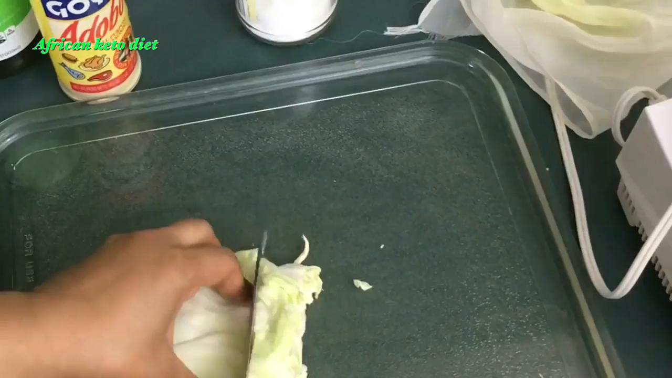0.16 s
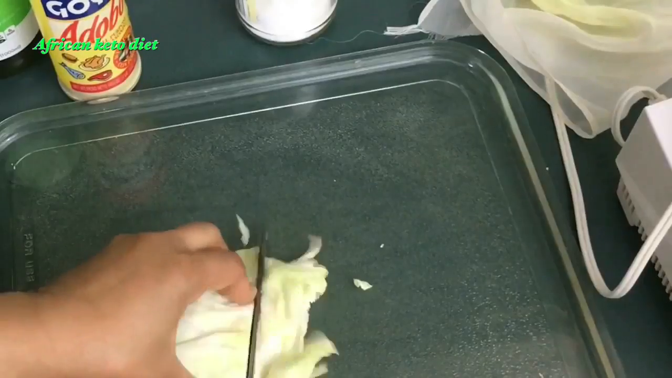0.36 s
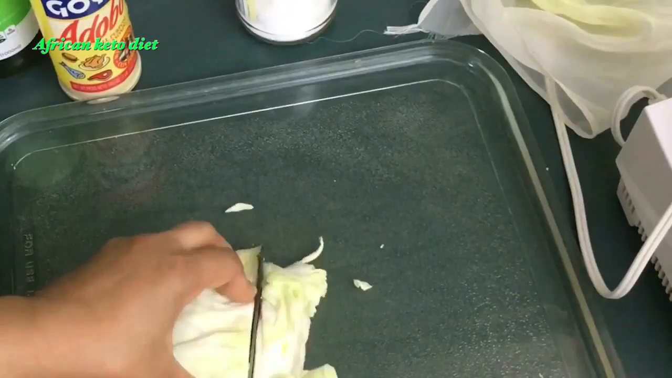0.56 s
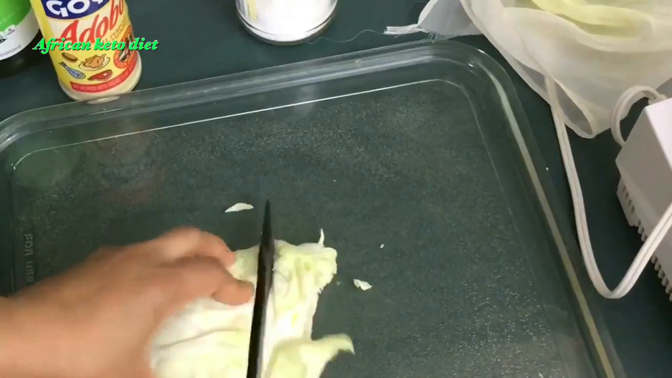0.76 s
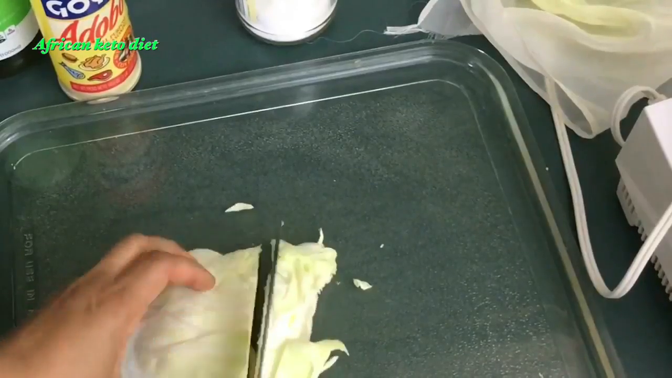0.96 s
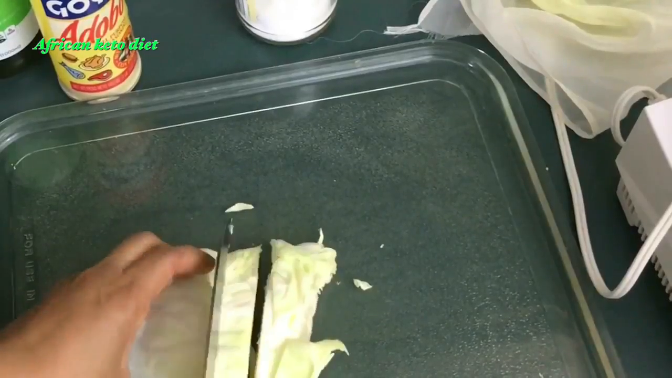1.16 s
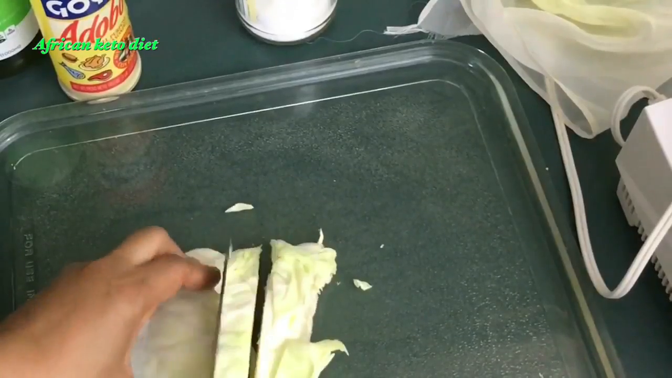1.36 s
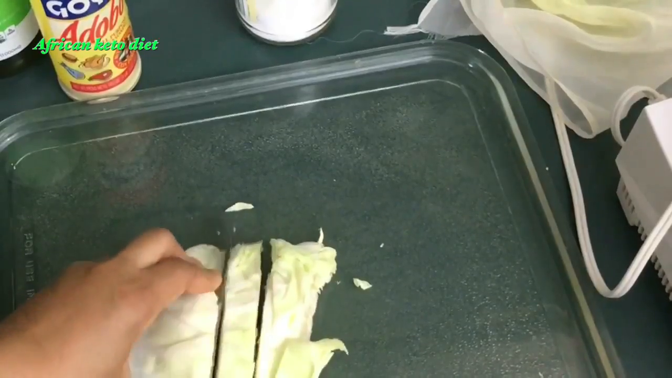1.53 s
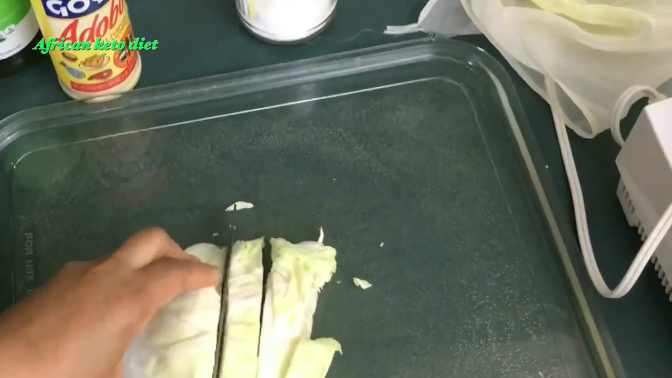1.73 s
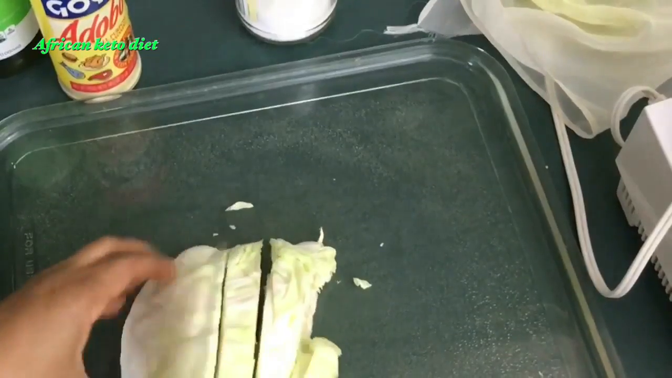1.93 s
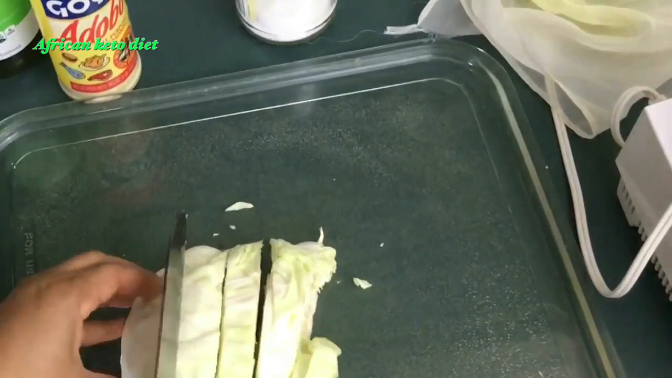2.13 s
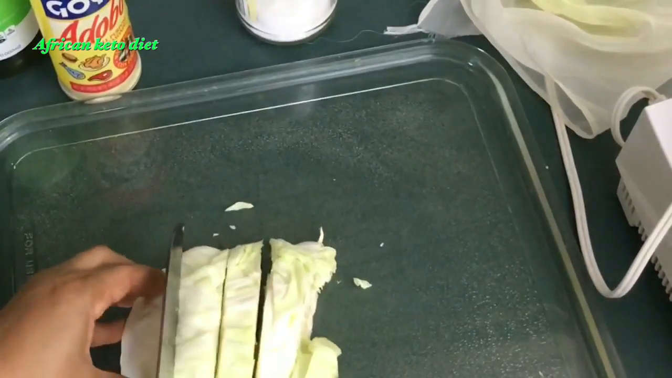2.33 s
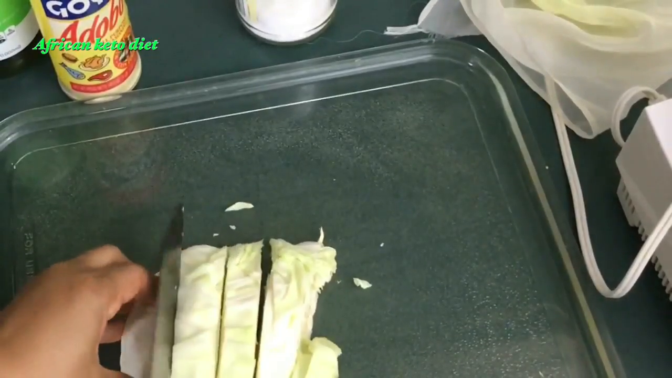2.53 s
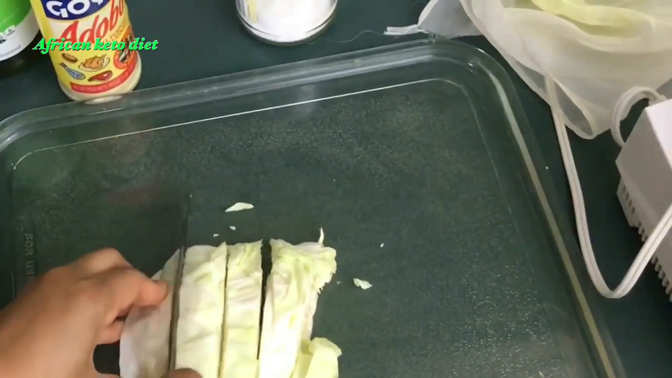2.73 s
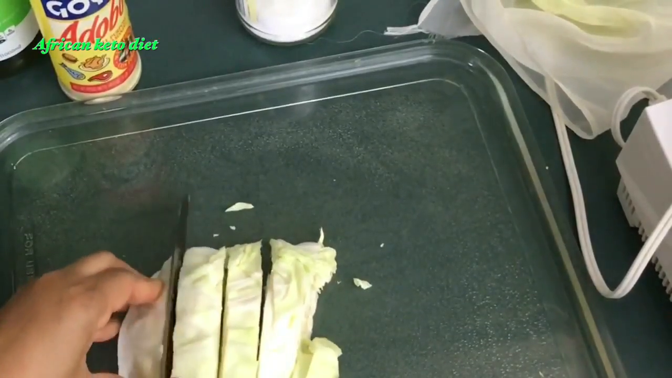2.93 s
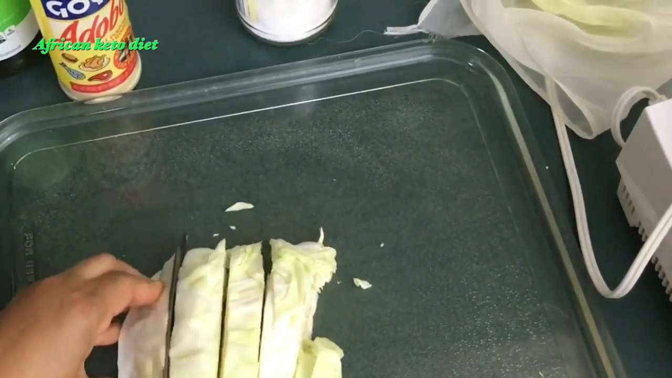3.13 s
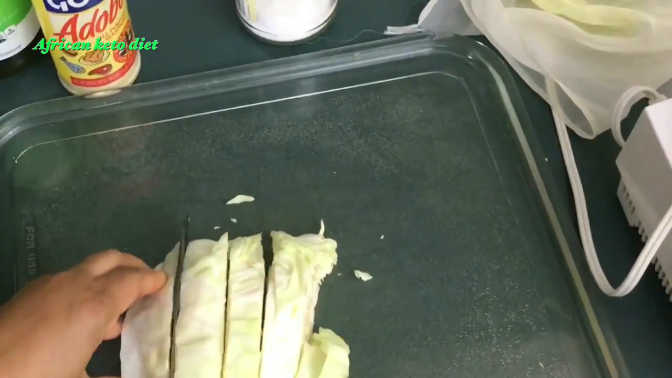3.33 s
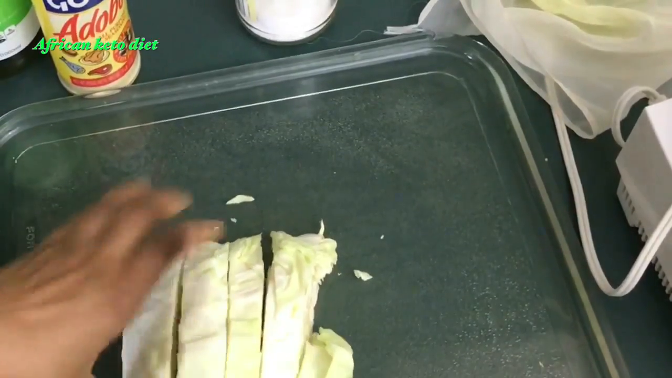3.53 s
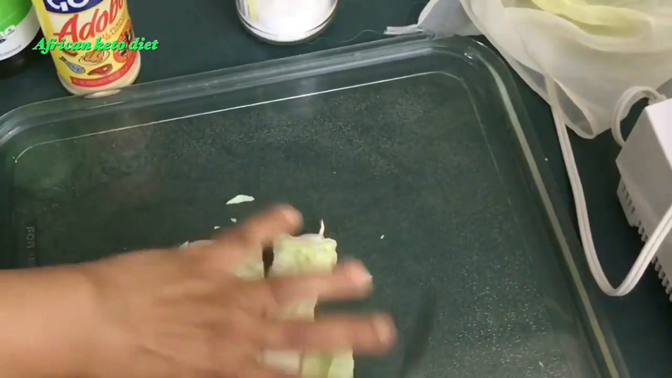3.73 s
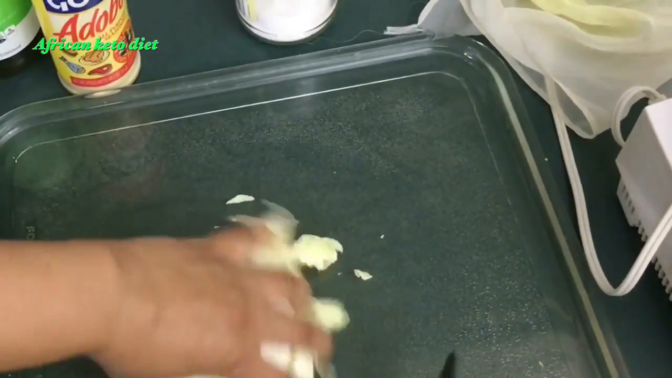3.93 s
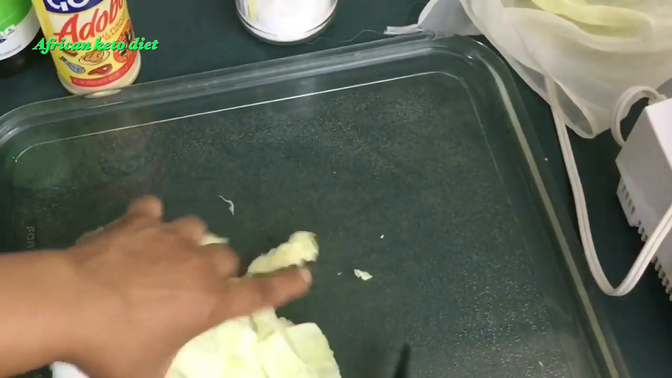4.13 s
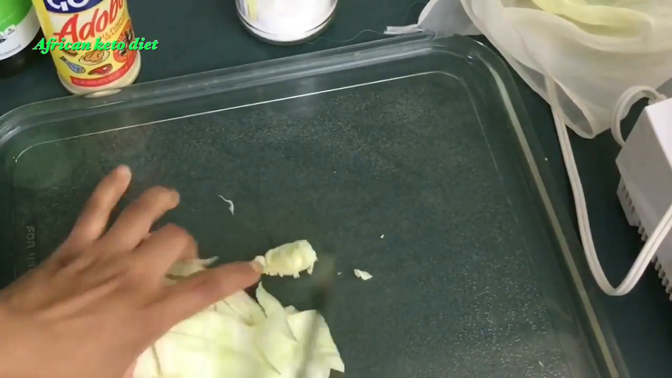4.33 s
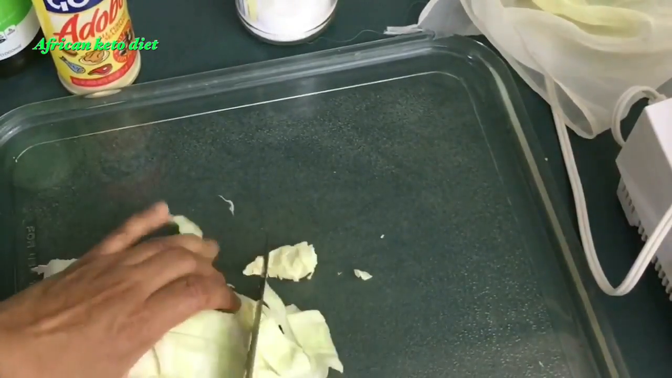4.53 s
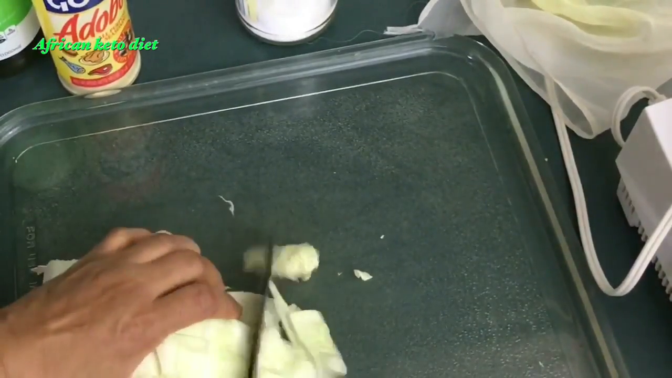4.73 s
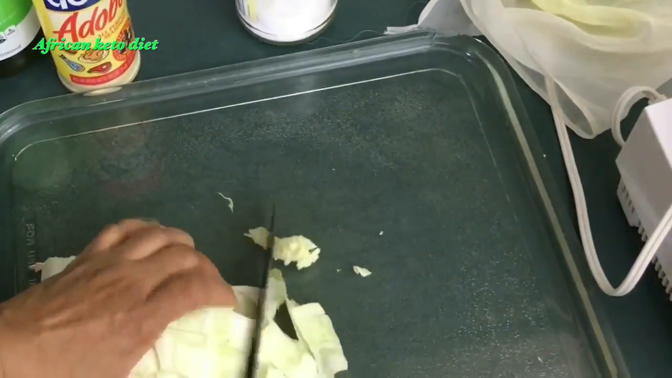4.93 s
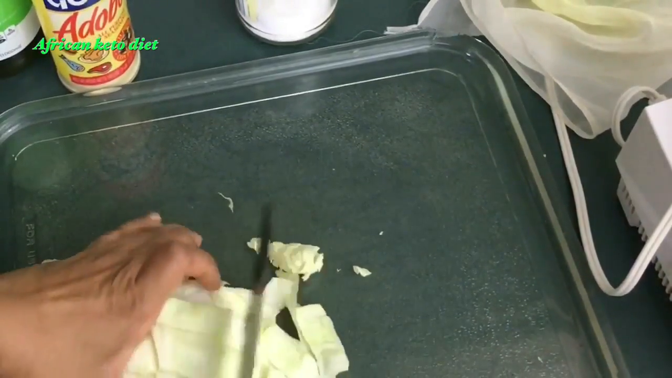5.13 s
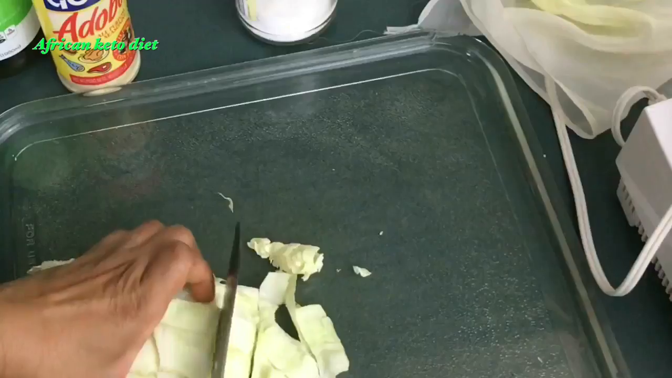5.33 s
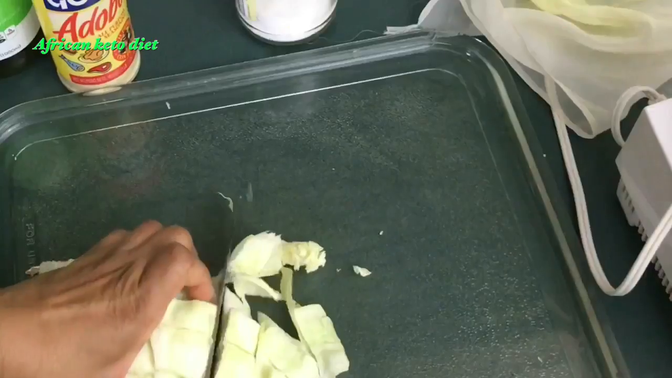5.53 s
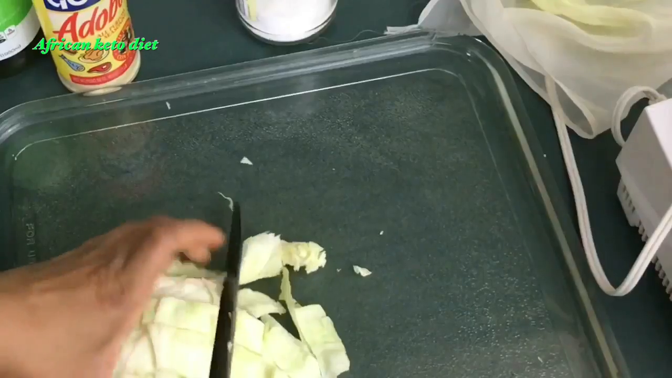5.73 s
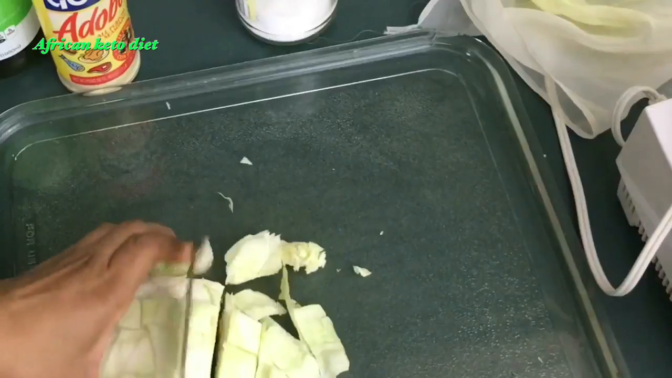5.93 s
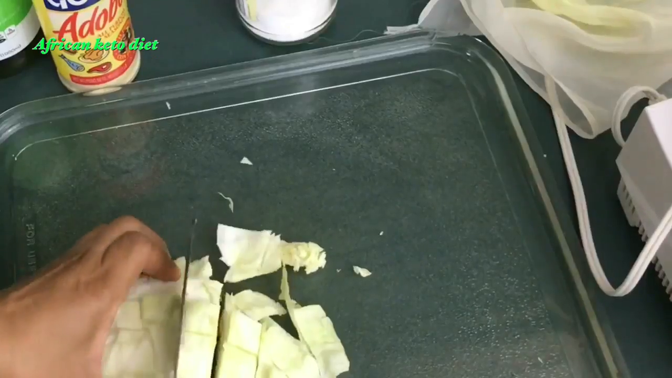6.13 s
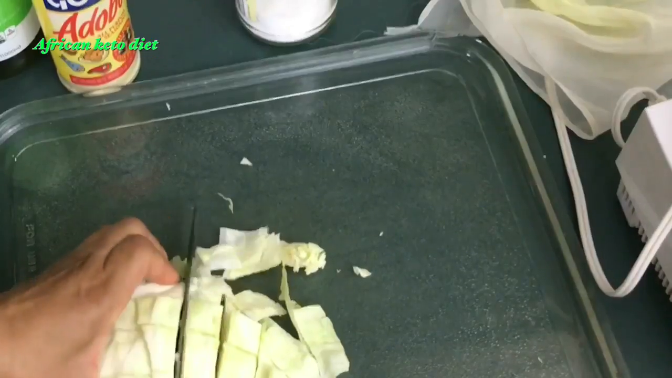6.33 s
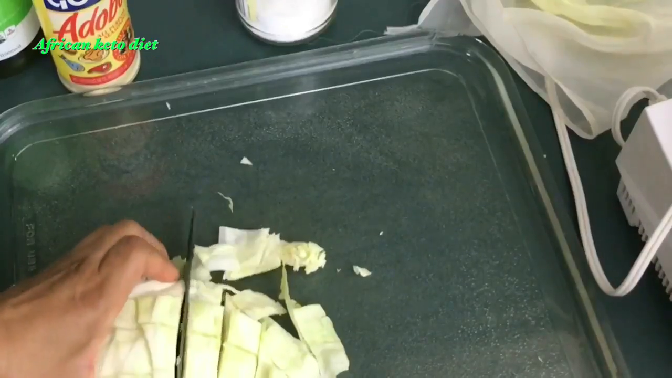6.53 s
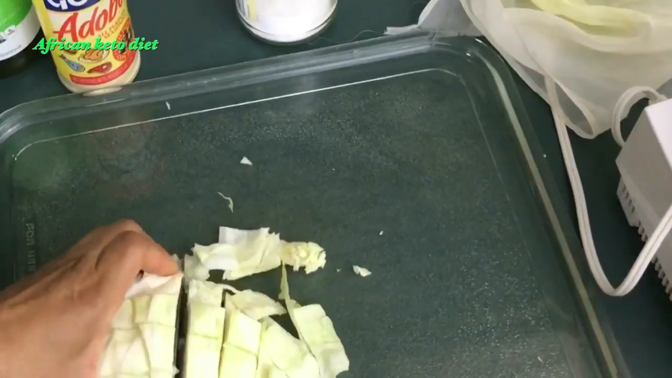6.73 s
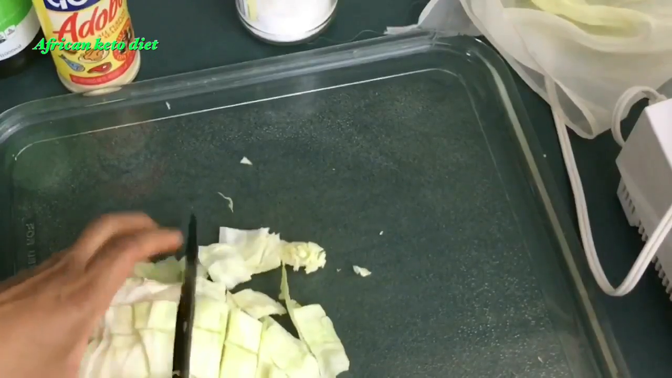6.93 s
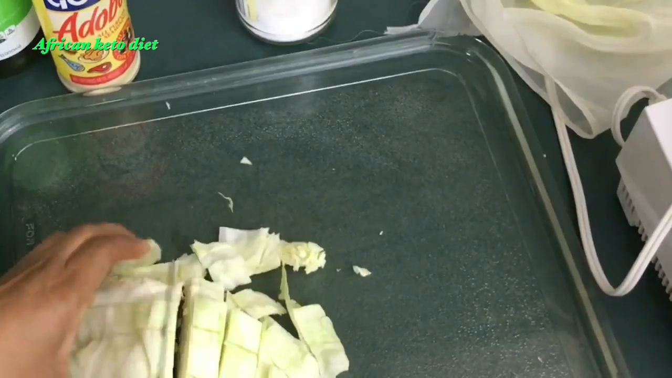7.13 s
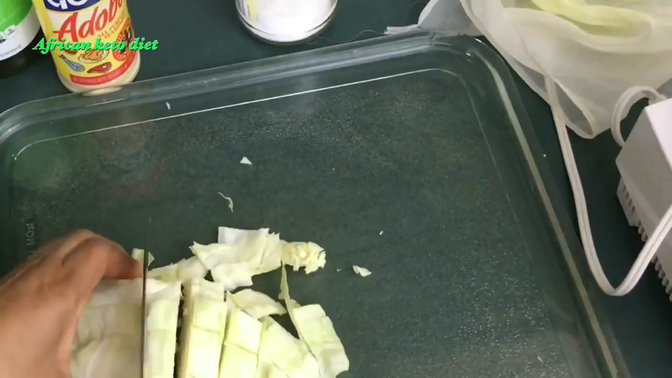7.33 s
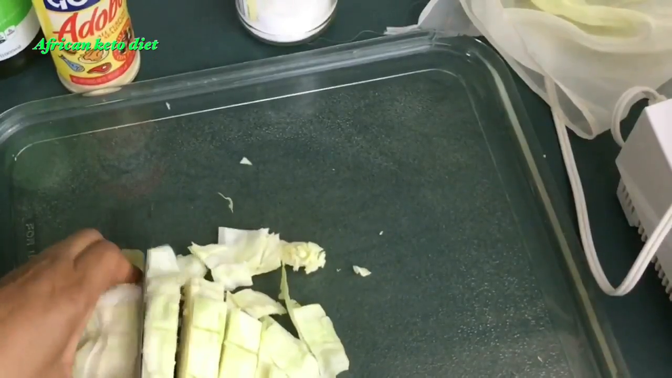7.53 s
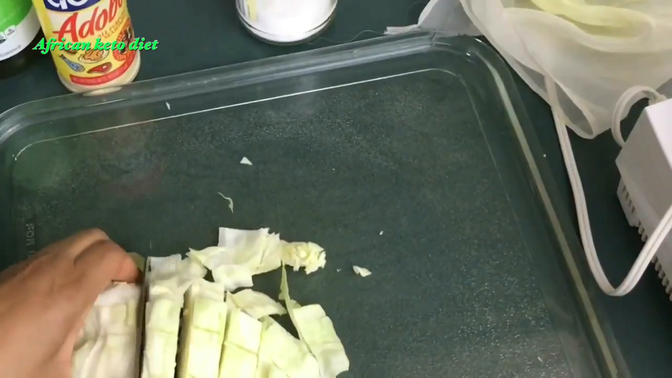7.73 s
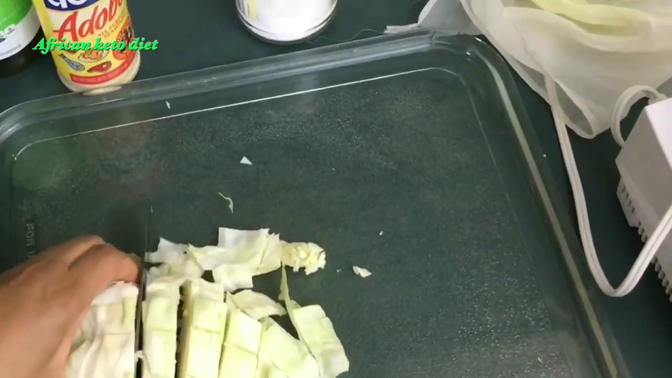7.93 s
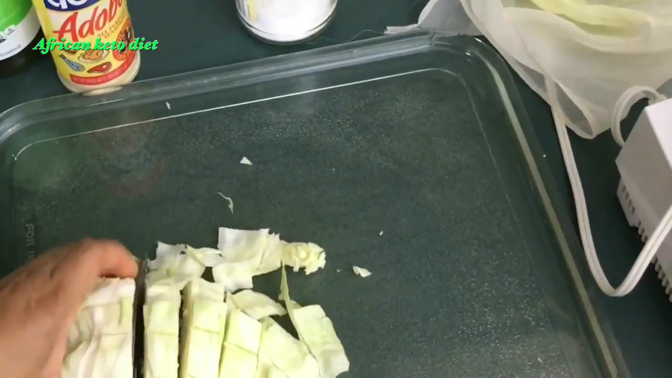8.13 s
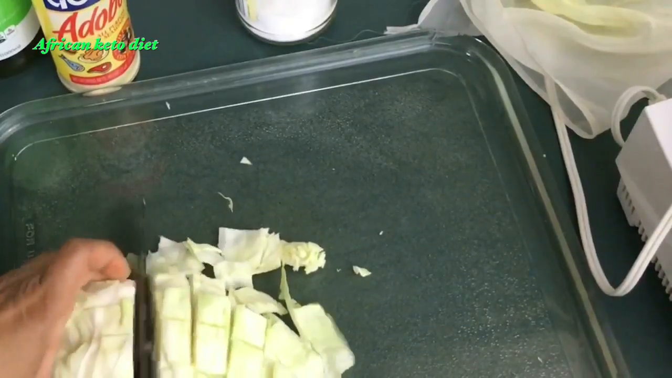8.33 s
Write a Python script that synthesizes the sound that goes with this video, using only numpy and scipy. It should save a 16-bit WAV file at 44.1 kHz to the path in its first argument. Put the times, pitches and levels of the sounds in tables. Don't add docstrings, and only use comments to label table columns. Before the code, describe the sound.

Close phone pickup in a small, hard-walled kitchen: a knife crunches through cabbage, leaves crackling and thick ribs snapping, until the blade bangs on a glass dish. The loudest landings distort, with brief glassy and steely ringing and a low counter thud. Leaves rustle and slide between cuts over a soft appliance hum.

```python
import sys
import numpy as np
from scipy import signal
from scipy.io import wavfile
from scipy.ndimage import uniform_filter1d

SR = 44100
rng = np.random.default_rng(int(sys.argv[2]) if len(sys.argv) > 2 else 0)


def transcribe(u):
    v = np.clip(np.atleast_2d(u).T, -1, 1)
    q = np.round(v * 32767).astype(np.int16)
    wavfile.write(sys.argv[1], SR, q)


def ratio_of_db(decibels):
    return 10 ** (np.asarray(decibels, float) / 20)


N = 373527


def rms_one(x):
    return x / np.sqrt(np.mean(x ** 2) + 1e-20)


def at_hz(points, hz, column=1):
    points = np.array(points)
    return np.interp(np.log(hz), np.log(points[:, 0]), points[:, column])


def band(x, low_hz, high_hz):
    edges_hz = [low_hz, min(high_hz, 0.45 * SR)]
    return signal.sosfilt(signal.butter(2, edges_hz, "band", fs=SR, output="sos"), x)


def drift(rate_hz):
    r = np.exp(-2 * np.pi * rate_hz / SR)
    slow = signal.lfilter([1], [1, -2 * r, r * r], rng.standard_normal(N + SR))
    return rms_one(slow[SR:])


def ring(force, hz, t60_s):
    r, w = ratio_of_db(-60 / (t60_s * SR)), 2 * np.pi * hz / SR
    return signal.lfilter([0, np.sin(w)], [1, -2 * r * np.cos(w), r * r], force + 1e-18)


def add(out, s, sound):
    start = round(s * SR)
    out[start:start + len(sound)] += sound[:N - start]


def octave_thirds(count):
    edges, white = 22 * 2 ** (np.arange(30) / 3), rng.standard_normal((2, count))
    bands = enumerate(zip(edges, edges[1:]))
    return [(np.sqrt(low * high), band(white[k % 2], low, high)) for k, (low, high) in bands]


# pitch_hz, level_db (per Hz)
HUM_SPECTRUM = [(15, -45), (25, 7), (64, 5), (161, -5.5), (229, 4), (463, -15), (796, -11.5), (936, -4.5),
                (1040, -13.5), (1840, -15.5), (2760, -22), (6560, -24.5), (10400, -29), (14800, -31.5),
                (16500, -43.5)]


def hum():
    noise = sum(ratio_of_db(at_hz(HUM_SPECTRUM, hz)) * part for hz, part in octave_thirds(count=N))
    return ratio_of_db(-44 + 1.0 * drift(0.69)) * rms_one(noise)


# pitch_hz, level_db, t60_s
KITCHEN_ECHO = [(151, 2, 0.3), (400, 1.5, 0.32), (1000, 7, 0.31), (2556, 3.5, 0.38), (4250, 1, 0.39),
                (7000, -6.5, 0.31), (10500, -3, 0.17), (14900, 1.5, 0.16)]


def walls():
    t, room = np.arange(SR) / SR, []
    for hz, part in octave_thirds(count=SR):
        fall_db = 60 * t / at_hz(KITCHEN_ECHO, hz, column=2)
        fading = ratio_of_db(-fall_db) + ratio_of_db(-21.5 - 0.39 * fall_db)
        room.append((ratio_of_db(at_hz(KITCHEN_ECHO, hz)) * fading, part))
    return room


def kitchen(x, room, spot):
    t = np.arange(SR) / SR
    echo = sum(fading * np.roll(part, spot * SR // 11) for fading, part in room)
    echo *= 1 - np.exp(-t / 0.00038)
    return signal.fftconvolve(x, echo / np.sqrt(np.sum(echo ** 2)))[:N]


# pitch_hz, level_db, t60_s
COUNTER_MODES = [
    (79.6, -5.5, 0.11),
    (141.9, -3, 0.12),
    (233, -8.5, 0.11),
]


def counter(force):
    return sum(ratio_of_db(level_db) * ring(force, hz, t60_s) for hz, level_db, t60_s in COUNTER_MODES)


# peak_s, level_db
LEANS = [(0.0, -33), (.16, -29.5), (.45, -29), (1.27, -40.5), (1.55, -28.5), (1.72, -20), (2.6, -32.5),
         (2.78, -25.5), (3.0, -42), (3.2, -41), (3.35, -27), (4.17, -33.5), (4.88, -25.5), (5.37, -39.5),
         (5.59, -22.5), (6.1, -43), (6.27, -29), (6.46, -23.5), (7.45, -37.5), (7.709, -27), (8.09, -24.5),
         (8.4, -44)]


def weight():
    rise_db_per_s, fade_db_per_s, rest_db = 165, 164, -51
    t, level_db = np.arange(N) / SR, rest_db
    for s, peak_db in LEANS:
        away_db = np.maximum(rise_db_per_s * (s - t), fade_db_per_s * (t - s))
        level_db = np.maximum(level_db, peak_db - away_db)
    return ratio_of_db(level_db)


def narrow_swells(table):
    out, white = np.zeros(N), rng.standard_normal(N + SR)
    for s, length_s, hz, width_hz, level_db in table:
        grain = white[round(hz):][:round(length_s * SR)]
        rub = band(grain, hz - width_hz / 2, hz + width_hz / 2)
        add(out, s, ratio_of_db(level_db) * rms_one(rub) * signal.windows.tukey(len(rub), 0.85))
    return out


# start_s, length_s, pitch_hz, width_hz, level_db
BUMPS = [(1.242, 0.17, 45.3, 31, -36), (1.501, 0.16, 77, 25, -27), (1.64, 0.098, 140, 46, -20.5),
         (2.2, 1.65, 91.5, 7.9, -41.5), (2.237, 0.15, 44.7, 32, -39.5), (2.877, 0.12, 42, 36, -35),
         (4.896, 0.18, 45, 57, -35), (5.348, 0.097, 54.6, 43, -36), (6.087, 0.13, 48, 26, -39),
         (6.265, 0.15, 76, 19, -29.5), (6.401, 0.098, 140, 40, -26.5), (7.366, 0.19, 60, 34, -34),
         (7.6, 0.17, 139, 29, -29.5), (8.298, 0.15, 55, 35, -41)]


def bumps():
    return narrow_swells(BUMPS)


# start_s, length_s, pitch_hz, width_hz, level_db
SLIDES = [(0.865, 0.13, 3430, 400, -43), (2.368, 0.12, 3720, 300, -53), (3.78, 0.43, 1956, 120, -51.5),
          (3.854, 0.16, 3830, 300, -61.5), (4.14, 0.027, 6130, 705, -34.5), (4.25, 0.038, 5200, 500, -38),
          (4.33, 0.27, 1900, 120, -43.5), (4.351, 0.21, 3700, 180, -54), (6.611, 0.1, 3540, 277.8, -40.5),
          (6.901, 0.2, 3520, 250, -48), (6.91, .04, 4740, 250, -52), (6.967, 0.029, 932, 250, -34),
          (6.98, 0.055, 1750, 250, -46), (8.289, 0.069, 2100, 400, -30), (8.302, 0.051, 1400, 400, -33),
          (8.306, 0.27, 3500, 300, -51), (8.309, 0.18, 7000, 250, -51), (8.32, .1, 8440, 250, -48)]


def slides():
    return narrow_swells(SLIDES)


# start_s, length_s, crackle_db, top_db and body_db (re crackle)
SLICES = [(0.394, 0.083, -21, -7, -1), (1.489, 0.16, -21.5, -5, 0), (2.67, 0.033, -41, -5, 10),
          (2.698, 0.18, -23.5, -12, -1.5), (3.07, 0.11, -36, 4, -32), (3.208, 0.046, -47.5, -5, -12),
          (3.247, 0.093, -32, -6, -1), (4.776, 0.067, -45.5, 7, 1), (5.44, 0.068, -40.5, 1.5, -2),
          (6.249, 0.033, -33, 1.5, 9), (6.766, 0.017, -35, 4, 11.5), (6.881, 0.09, -30.5, -20, -7),
          (7.577, .11, -24.5, -1.5, -7.5), (7.933, 0.098, -22.5, -9.5, -7.5)]
# start_s, crackle_db, top_db and body_db (re crackle), fade_db_per_s
BITES = [(0.0, -40, 5.5, 8, 614), (0.05, -40, 9, -1, 401), (.086, -28.5, 3.5, 0.5, 293),
         (0.132, -26.5, -2.5, 3, 248), (0.26, -28, -5, -5, 208), (0.923, -35, -12, 8.5, 498),
         (1.337, -36.5, 3, -2, 393), (1.393, -43.5, 4.5, -4, 209), (2.491, -36.5, 3, 7.5, 280),
         (2.592, -26.5, -9.5, 2.5, 300), (2.624, -31.5, -11, 2, 250), (2.938, -45, -12, 1, 211),
         (4.235, -53, -8, 18.5, 250), (4.745, -46, 5.5, 15, 298), (4.844, -21.5, -2, 4, 256),
         (5.482, -38.5, -4, 9.5, 200), (5.5304, -16.5, -6.5, -1.5, 148), (5.82, -33.5, -27, -6, 196),
         (6.211, -42.5, 13.5, 5, 502), (6.319, -18, -9, -1, 113), (6.978, -42, -0.5, 0, 201),
         (7.478, -35, 2.5, -1.5, 304), (7.689, -31, -27, 0, 252), (8.289, -29.5, -8.5, -16, 101),
         (8.46, -50, -2, -3, 100)]
# start_s, length_s, crackle_db, top_db and body_db (re crackle)
RUSTLES = [(0.6, 0.23, -37.5, -10.5, -3), (1.478, 0.033, -37.5, -4, -5), (1.84, 0.091, -41.5, -32, -4.5),
           (2.088, 0.014, -55.5, 2, 3), (2.406, 0.34, -45, -4.5, -5.5), (2.914, 0.026, -41.5, -15, 0),
           (3.448, .1, -45, -25, 1), (3.942, 0.31, -49, -4, -18), (4.233, 0.27, -51, -14, -8),
           (4.313, 0.019, -64, 1, -10), (4.572, 0.013, -49, 1.5, -1), (5.082, 0.072, -44.5, -21, -3.5),
           (5.347, 0.024, -58.5, 8, -1.5), (6.069, 0.36, -55, 4, 4), (6.632, 0.15, -42.5, -9, -6.5),
           (6.81, 0.072, -49, 0, -18), (7.353, 0.078, -52.5, 3.5, -1), (7.78, 0.1, -43, -4, -7),
           (8.127, 0.072, -52, 7, 10), (8.314, 0.065, -43.5, -16, 6.5)]
# start_s, length_s, crackle_db, top_db and body_db (re crackle)
DROPS = [
    (0.472, 0.019, -30, -19, 4),
    (1.646, 0.021, -17, -13, -19),
    (3.287, 0.027, -25.5, -6, -10),
    (4.898, 0.026, -20, 0, -9),
    (5.579, 0.031, -16, -12, -9),
    (6.414, 0.016, -13, -5, -13),
    (8.04, 0.019, -14.5, -7, -5),
]


def cut_levels():
    # its row, entry dB, share of its length spent swelling, fade in dB per s
    moves = [(row, -11, 0.43, 502.5) for row in SLICES]
    moves += [((s, 0.0086, *levels), -13, 0.5, fade) for s, *levels, fade in BITES]
    moves += [(row, -6, 0.19, 126) for row in RUSTLES]
    moves += [(row, -19.5, 1, 893) for row in DROPS]
    gains, t = np.zeros((3, N)), np.arange(SR // 2) / SR
    for (s, length_s, crackle_db, top_db, body_db), entry_db, share, fade in moves:
        swell_db = entry_db * np.clip(1 - t / (share * length_s), 0, 1)
        shape_db = swell_db - fade * np.maximum(t - length_s, 0)
        for layer, layer_db in zip(gains, [0, top_db, body_db]):
            add(layer, s, ratio_of_db(crackle_db + layer_db + shape_db))
    grip_db = 1 * drift(5.2)
    wander = ratio_of_db(np.array([grip_db, grip_db, grip_db + 3 * drift(12.6)]))
    return uniform_filter1d(gains, size=44, axis=1) * wander


def bursting_cells(per_s, spread_db, clump_db):
    sizes = ratio_of_db(spread_db * np.minimum(rng.exponential(1, N), 5)) * rng.choice([-1, 1], N)
    return sizes * (rng.random(N) < per_s * ratio_of_db(clump_db * drift(70)) / SR)


# pitch_hz, level_db (per Hz)
CRACKLE = [(530, -34), (900, -4), (1150, 15), (1290, -9.5), (1880, -6.5), (2190, -1.5), (2860, -34),
           (3510, -2.5), (4410, -2), (9200, -28.5), (10400, -23.5), (14500, -27.5), (16000, -61)]
# pitch_hz, level_db, t60_s
DISH = [(407.5, -1, 0.096), (507, -1, 0.062), (641, 2.5, 0.041), (800, -13, 0.12), (888, -8.5, 0.06),
        (1010, -6.5, 0.065), (1130, -11.5, 0.067), (1695, 0, 0.015), (2234, -3.5, 0.04), (2628, 0, 0.025),
        (3500, -8, .035), (3800, -8.5, 0.04), (3940, -20, 0.07), (4920, -18.5, 0.079), (4500, -24, .12),
        (5310, -1, 0.061), (5650, -7.5, 0.097), (6050, -8, 0.093), (6530, -5.5, 0.039),
        (6900, -11.5, 0.087), (7000, -30.5, 0.24), (8350, -13, 0.097), (9300, -4.5, 0.038),
        (10870, -9, 0.084), (11550, -25.5, 0.081), (12900, -22, 0.1)]


def leaves(crackle, top, body):
    cells = bursting_cells(per_s=5500, spread_db=2.0, clump_db=3.0)
    pitches, dealt = np.geomspace(1200, 15500, 26), rng.integers(0, 26, N)
    rings = []
    for k, hz in enumerate(pitches):
        burst = rms_one(ring(cells * (dealt == k), hz, 3.8 / hz))
        rings.append(ratio_of_db(at_hz(CRACKLE, hz)) * np.sqrt(hz) * burst)
    low, high = sum(rings[:18]), sum(rings[18:])

    push = bursting_cells(per_s=1500, spread_db=3.5, clump_db=3.0)
    shaken = sum(ratio_of_db(level_db) * ring(push, hz, 1.12 * t60_s) * (-1) ** k
                 for k, (hz, level_db, t60_s) in enumerate(DISH[:8]))
    shaken = rms_one(band(shaken, 340, 2120)) + 0.26 * rms_one(band(push, 270, 1225))

    chime = sum(ratio_of_db(level_db) * ring(cells, hz, 0.2 * t60_s) for hz, level_db, t60_s in DISH[8:])
    low = rms_one(low) + 0.5 * rms_one(chime)
    return crackle * rms_one(low) + top * rms_one(high) + ratio_of_db(-1.5) * body * rms_one(shaken)


# start_s, peak_db, pitch_hz
RIB_SNAPS = [(0.0375, -10, 8280), (0.0562, -3.5, 1010), (0.0882, -6, 7450), (0.0875, -3.5, 2500),
             (0.134, 8, 1010), (0.1803, -3, 4090), (0.263, 0, 1844), (0.4078, -3, 2300), (0.428, -5, 4470),
             (0.6776, -4, 1300), (0.691, -11, 1500), (0.9268, -8, 1500), (0.938, -8, 1500),
             (1.009, -23, 2500), (1.022, -24, 2300), (1.198, -33, 4000), (1.2331, -22, 11180),
             (1.3257, -14, 1000), (1.338, -11, 3380), (1.399, -16, 3870), (1.41, -16, 4500),
             (1.4861, -17, 3590), (1.494, -9, 3670), (1.5814, -5, 4660), (1.534, -5, 3800),
             (1.607, 0, 9040), (1.627, 4.5, 4500), (2.103, -29, 5000), (2.168, -29, 8000),
             (2.2144, -27, 13000), (2.27, -29, 6030), (2.4583, -18, 9000), (2.4937, -3, 1010),
             (2.5224, -15, 2170), (2.5743, -0.5, 1130), (2.5955, -2, 3260), (2.6245, 6, 1080),
             (2.6248, 2.5, 3820), (2.689, 1, 1320), (2.7, 2, 3670), (2.7182, 4.5, 4210),
             (2.7621, 4.5, 2140), (2.802, 7, 2280), (2.836, 2, 3480), (2.851, -5, 4500),
             (2.865, 7.5, 1097), (3.172, -6, 5000),
             (4.5867, -21, 6150), (4.627, -13, 1240), (4.739, -23, 8500), (4.7534, -23, 4000),
               (4.776, -5.5, 1820), (4.789, -15, 4000), (4.843, -10, 3000), (4.8484, -15, 1400),
               (4.852, 8.5, 625), (4.896, 1, 4000), (5.143, -31, 12000), (5.4266, -11.5, 11000),
               (5.4462, -7, 12000), (5.469, -12, 11000), (5.488, -10, 9000), (5.499, -8, 12000),
               (5.53, -4, 1980), (5.5305, -6, 4000), (5.855, -21, 9130), (6.215, -11, 1020),
               (6.2476, 4, 1070), (6.262, 4.5, 1100), (6.266, -16, 3500), (6.315, 10, 1120),
               (6.3185, -11, 3500), (6.327, 11.5, 1150), (6.415, 1, 6000), (6.851, -22, 13030),
               (6.916, -1, 1700), (6.9856, -10, 1700), (7.354, -16, 12000), (7.405, -16, 11000),
               (7.4884, 0.5, 1040), (7.603, -9, 1090), (7.624, 9, 1160), (7.649, 9, 1200), (7.675, 7, 1400),
               (7.803, -18, 9000), (7.877, -16, 7000), (7.935, -2, 1180), (8.197, -29, 11000),
               (8.294, -21, 5000), (8.309, -5, 3500)]


def snaps():
    out, t = np.zeros(N), np.arange(SR // 25) / SR
    for s, peak_db, hz in RIB_SNAPS:
        spray = rng.standard_normal(len(t)) * np.exp(-t / 0.0053)
        wide = 0.54 * band(spray, 400 + 0.35 * hz, 7000 + 2.44 * hz)
        peak = 2.47 * min(1, 4000 / hz) * band(spray, hz / 1.26, hz * 1.25)
        add(out, s, ratio_of_db(peak_db - 18) * (wide + peak))
    return out


# peak_s, peak_db, pitch_hz
THUMPS = [(0.088, -16, 677), (0.136, -10.5, 410), (0.179, -15, 405), (0.265, -18.5, 378), (0.398, -29, 447),
          (0.44, -9, 665), (0.472, -6, 610), (0.501, 0.5, 647), (0.676, -16.5, 426), (0.929, -28, 410),
          (1.495, -14, 820), (1.53, -5.5, 615), (1.574, -8, 412), (1.608, -9, 500), (1.619, -5, 400),
          (1.676, 5, 669), (2.498, -22, 626), (2.601, -13, 425), (2.688, -26, 528), (2.724, -16, 581),
          (2.743, -6.5, 403), (2.78, -8, 510), (2.837, -18, 583), (3.272, -25.5, 615), (3.322, -5, 620),
          (4.169, -1.5, 886), (4.757, -19.5, 396), (4.85, -5, 575), (4.903, -5, 625), (4.957, -9.5, 618),
          (5.469, -24, 406), (5.539, -15, 388), (5.594, -9, 610), (5.613, -2, 518), (6.247, -21, 649),
          (6.324, -12, 523), (6.414, -16, 926), (6.426, 1, 1010), (6.779, -10.5, 524), (7.49, -23, 650),
          (7.585, -22, 537), (7.633, -12, 398), (7.666, -9.5, 409), (7.69, -23, 552), (7.935, -21, 999),
          (7.956, -13, 999), (8.054, -11, 690), (8.124, -20, 690), (8.216, -12, 1010)]


def thumps():
    rise_s, ring_cycles = 0.00191, 36
    out, t = np.zeros(N), np.arange(SR // 8) / SR
    for s, peak_db, hz in THUMPS:
        push = (1 + 3.1 * rng.standard_normal(len(t))) * t * np.exp(-t / rise_s)
        boom = ring(push, hz, ring_cycles / hz)
        add(out, s - rise_s, ratio_of_db(peak_db - 6.5) * boom / np.abs(boom).max())
    return out


def strike(modes, ring_db, spread_db, draw, detune=0):
    click = np.arange(len(draw)) == 0
    rocking = ratio_of_db(4 * rms_one(band(draw, 16.0, 119)))
    out = 0
    for (hz, level_db, t60_s), luck, shift in zip(modes, draw, draw[len(modes):]):
        mode = ring(np.sign(luck) * click, hz * (1 + detune * shift), t60_s)
        waver = np.roll(rocking, round(10 * hz))
        out = out + ratio_of_db(ring_db + level_db + spread_db * luck) * waver * mode
    return out


def landing(draw, length_s, low_hz, dull_hz):
    t = np.arange(len(draw)) / SR
    return band(draw * np.exp(-t / length_s) * (1 - np.exp(-t / 0.0023)), low_hz, dull_hz)


# pitch_hz, level_db, t60_s
BLADE = [(6090, -4, .13), (6690, -2, .15), (6860, -6, .11), (7020, -3, .13), (8420, -3, .15),
         (8600, -4, .14), (9275, -1, .17), (9930, -7, .13), (10300, -10, .11), (10950, -1, .14),
         (11800, -3, .15), (12300, -7, .13), (13280, 0, .14), (13800, -6, .12)]
# pitch_hz, level_db, t60_s
TIP = [(885, -10.5, 0.05), (1360, -6.5, 0.062), (1700, -1.5, 0.043), (2650, -6, 0.079), (3300, -24, 0.17),
       (3950, -6, 0.049), (4040, -26, 0.15), (4500, -15, 0.09), (5380, -14, 0.13), (5960, -24, 0.12),
       (6500, -23, 0.14), (7000, -23, 0.15), (7515, -30, 0.15), (8409, -18.5, 0.18), (8700, -30, 0.13),
       (8900, -20, 0.1), (9400, -30, 0.15), (10300, -27, .1), (10760, -26, 0.1), (11700, -27, .09),
       (12300, -33, .09), (13220, -22, 0.088), (15700, -29, .08)]
# start_s, level_db
GRAZES = [
    (6.915, -42.5),
    (6.965, -42.5),
    (6.987, -41),
]


def grazes():
    out = np.zeros(N)
    for s, level_db in GRAZES:
        add(out, s, strike(BLADE + TIP[2:8], level_db, spread_db=4.0, draw=rng.standard_normal(15100)))
    return out


# start_s, crack_db, contact_s, dulled_above_hz
KNOCK = (4.1685, 9.1, 0.0074, 2050)


def tip_knock():
    out, t, draw = np.zeros(N), np.arange(SR // 2) / SR, rng.standard_normal(SR // 2)
    s, crack_db, length_s, dull_hz = KNOCK
    high_modes = band(draw[::-1] * np.exp(-t / 0.015), 5000, 15800)
    shaken_leaves = band(draw[::-1] * np.exp(-t / 0.035), 550, 2600)
    add(out, s, ratio_of_db(crack_db - 30) * high_modes + ratio_of_db(crack_db - 23.0) * shaken_leaves)
    add(out, s, ratio_of_db(crack_db) * landing(draw, length_s, 390, dull_hz))
    add(out, s, strike(TIP, ring_db=-1.5, spread_db=2.0, draw=draw))
    add(out, s, strike(DISH[2:5], ring_db=-35.0, spread_db=-20.0, draw=draw))
    return out


# start_s, crack_db, contact_s, dulled_above_hz, ring_db
BLOWS = [
    (0.5013, 14.5, 0.0063, 9160, -9),
    (1.6704, 9.5, 0.015, 5000, -8),
    (3.322, 8, 0.0091, 6700, -11.5),
    (4.903, 8.5, 0.0073, 8700, -10),
    (5.6058, 10, 0.0074, 7000, -16.5),
    (6.425, 11, 0.0045, 5800, -8),
    (6.779, 8, 0.0055, 8700, -25),
    (8.0514, 8, 0.0075, 7000, -17),
    (8.215, -6.5, 0.0055, 3350, -68),
]
# leaf_band_hz, leaf_band_db, leaf_t60_s, blade_ring_db, liveliest_blade_hz
FREED = [
    (1000, -21, 0.11, -11, 6300),
    (700, -10, 0.27, -31, 6500),
    (800, -14, 0.23, -23.5, 5600),
    (1620, -2.5, 0.077, -13.5, 8800),
    (5480, -13.5, 0.083, -17, 6700),
    (1130, -4, 0.11, -30, 8400),
    (2170, -9.5, 0.037, -22.5, 7000),
    (716, -17, 0.25, -31, 6300),
    (1500, -13, 0.039, -59, 6100),
]
# centre_hz, level_db (re crack)
ECHOES = [
    (3000, -10),
    (3000, -6.5),
    (3330, -8),
    (2300, -7),
    (2500, -8.5),
    (2200, -7),
    (2800, -16),
    (2500, -12.5),
    (1790, -8.5),
]


def blows(room):
    out, t = np.zeros(N), np.arange(SR // 3) / SR
    push = np.exp(-t / 0.0016) / (0.0022 * SR)
    thud_lag_s, echo_octaves = 0.015, 1.76
    for spot, (blow, freed, (echo_hz, echo_db)) in enumerate(zip(BLOWS, FREED, ECHOES)):
        s, crack_db, length_s, dull_hz, ring_db = blow
        free_hz, free_db, free_t60_s, blade_db, lively_hz = freed
        draw = rng.standard_normal(len(t))

        crack = ratio_of_db(crack_db) * landing(draw, length_s, 420, dull_hz)
        struck = sum(ratio_of_db(6.5 * luck) * ring(crack, hz, 0.031)
                     for (hz, *_), luck in zip(DISH[10:17] + BLADE, draw[::-1]))
        struck = struck * np.sqrt(np.sum(crack ** 2) / np.sum(struck ** 2))
        crack = 0.65 * crack + ratio_of_db(-4.5) * struck

        blade = [(hz, level_db - 8 * abs(np.log2(hz / lively_hz)), t60_s) for hz, level_db, t60_s in BLADE]
        rings = strike(DISH, ring_db, spread_db=3.0, draw=draw, detune=0.01175)
        rings = rings + strike(blade, blade_db + 2.0, spread_db=2.5, draw=draw[::-1])
        damped = band(draw[::-1], free_hz / 1.18, free_hz * 1.126)
        rings = rings + ratio_of_db(free_db + 16.0 - 60 * t / free_t60_s) * damped
        add(rings, thud_lag_s, ratio_of_db(ring_db - 5) * counter(push)[:len(t) // 2])
        add(out, s, crack + rings)

        clap = band(1. * (t == 0), echo_hz / 2 ** echo_octaves, echo_hz * 2 ** echo_octaves)
        clap = ratio_of_db(echo_db) * clap * np.sqrt(np.sum(crack ** 2) / np.sum(clap ** 2))
        add(out, s, kitchen(clap + ratio_of_db(-15.0) * crack + ratio_of_db(-13.5) * rings, room, spot=spot + 1))
    return out


def scene():
    room = walls()
    rumble = weight() * rms_one(counter(rng.standard_normal(N)))
    cutting = leaves(*cut_levels()) + snaps() + slides() + bumps() + thumps()
    knock = tip_knock() + grazes()
    echo = kitchen(ratio_of_db(-13.5) * cutting + ratio_of_db(-19.5) * knock, room, spot=0)
    return (hum() + rumble + cutting + knock + echo + blows(room))[None, :]


# pitch_hz, width_hz, gain_db
MICROPHONE = [
    (3200, 1300, -1.5),
    (3910, 820, 3),
    (5000, 450, -5),
    (10450, 1700, -5),
]


def microphone(x):
    heard = signal.sosfilt(signal.butter(4, 50, "high", fs=SR, output="sos"), x)
    for hz, width_hz, gain_db in MICROPHONE:
        peak = signal.lfilter(*signal.iirpeak(hz, hz / width_hz, fs=SR), heard)
        heard = heard + (ratio_of_db(gain_db) - 1) * peak
    return heard


def top_cut(x):
    return signal.sosfilt(signal.cheby2(22, 63, 16000, fs=SR, output="sos"), x)


def roll_off(x):
    return signal.sosfilt(signal.butter(12, 15900, fs=SR, output="sos"), x)


def record(dry):
    heard = np.clip(microphone(dry), -0.83, 0.83)
    mix = top_cut(heard)
    return roll_off(mix)


dry = scene()
out = record(dry)
transcribe(out)
```